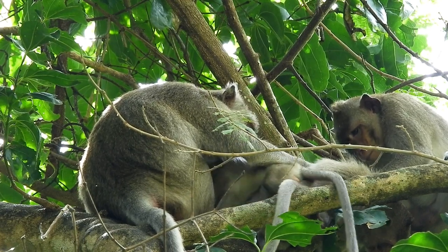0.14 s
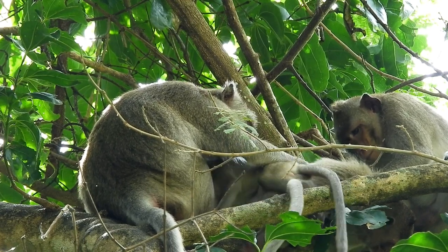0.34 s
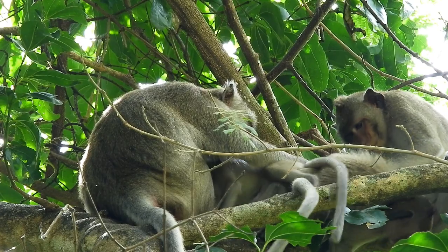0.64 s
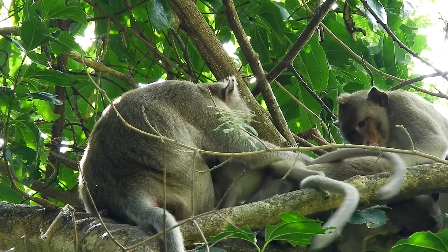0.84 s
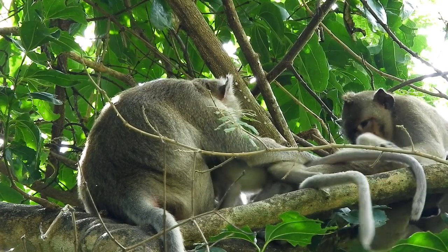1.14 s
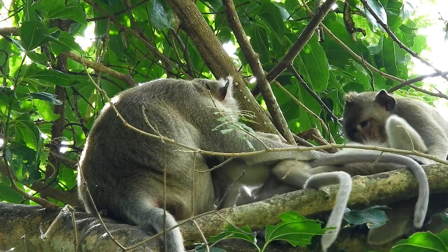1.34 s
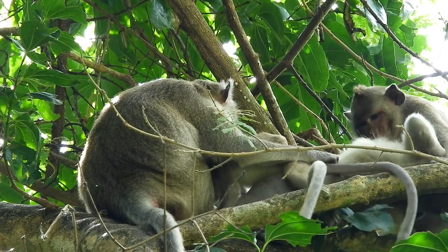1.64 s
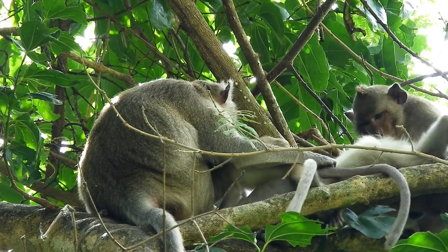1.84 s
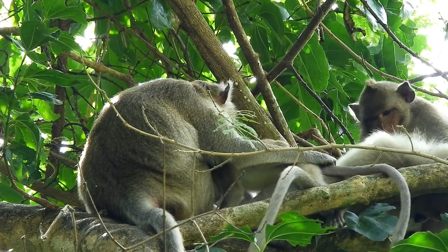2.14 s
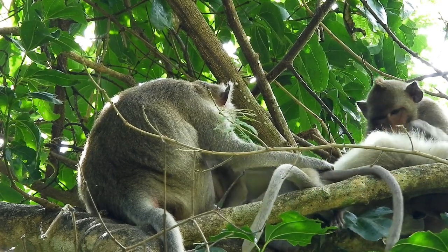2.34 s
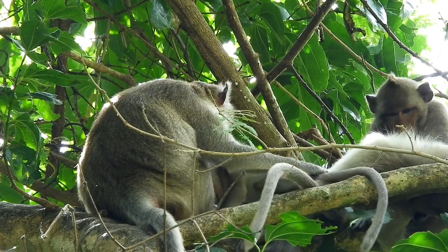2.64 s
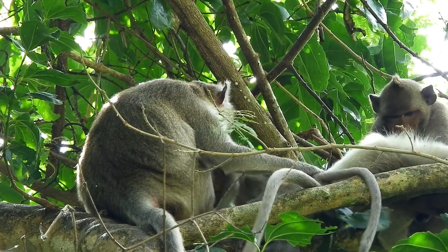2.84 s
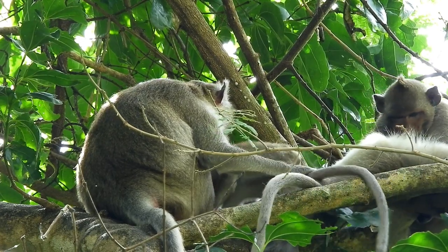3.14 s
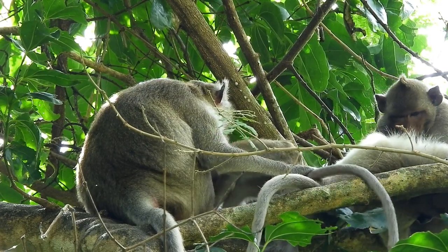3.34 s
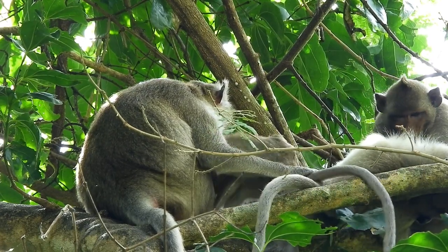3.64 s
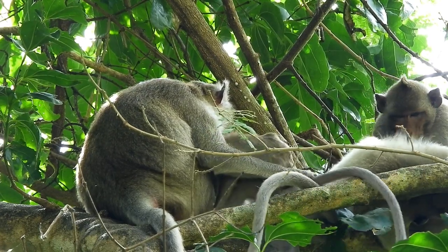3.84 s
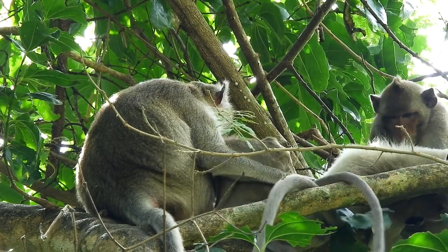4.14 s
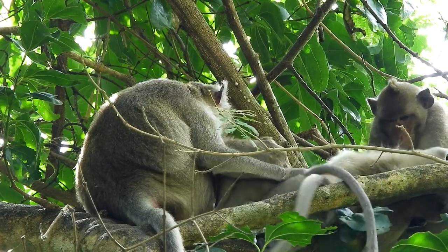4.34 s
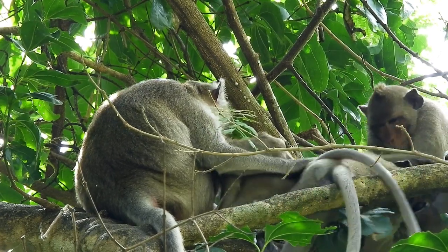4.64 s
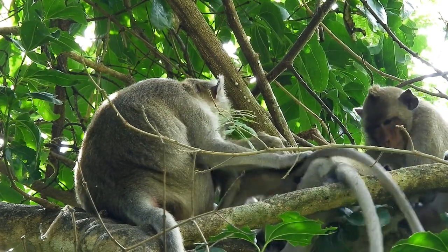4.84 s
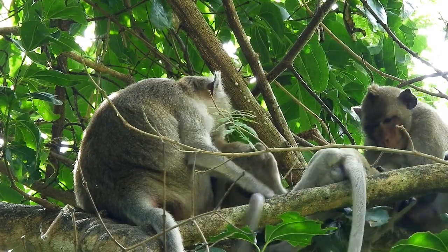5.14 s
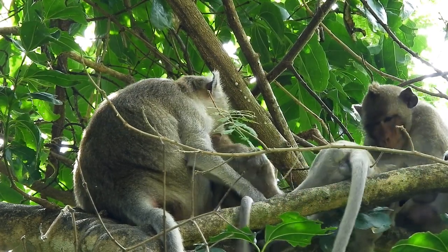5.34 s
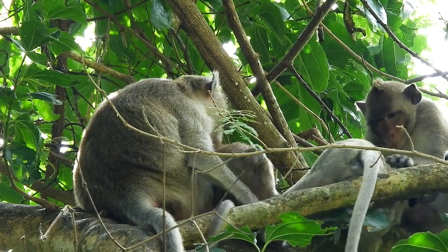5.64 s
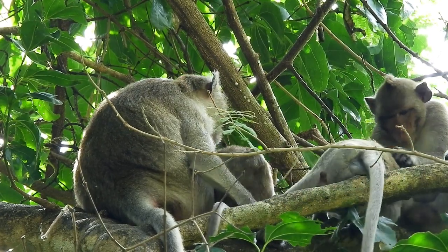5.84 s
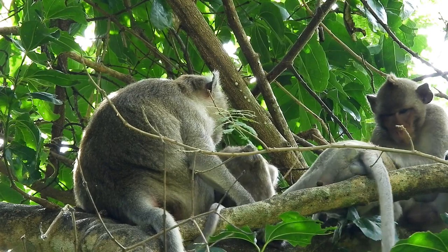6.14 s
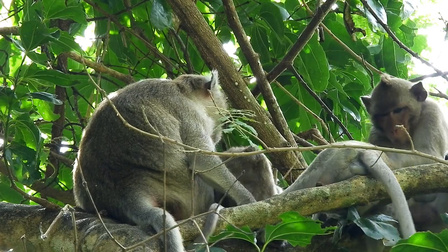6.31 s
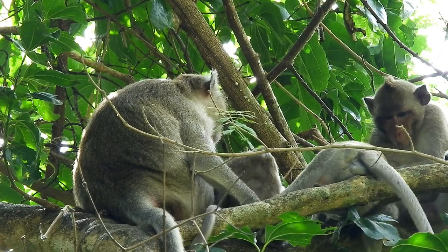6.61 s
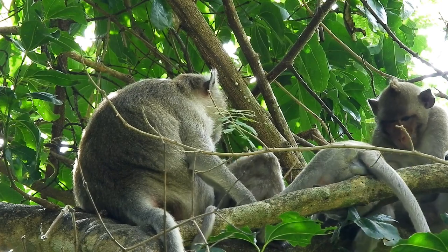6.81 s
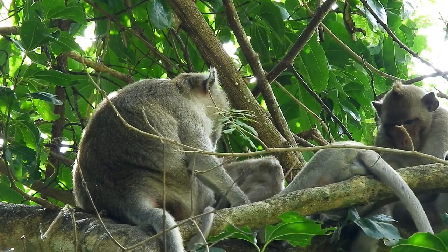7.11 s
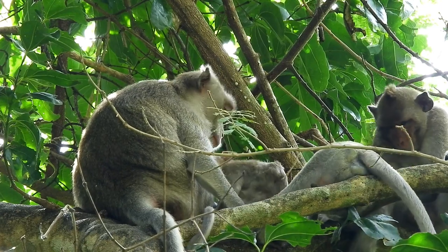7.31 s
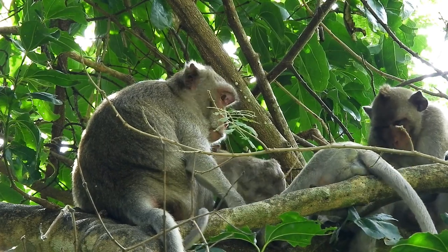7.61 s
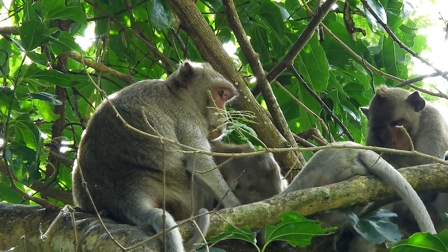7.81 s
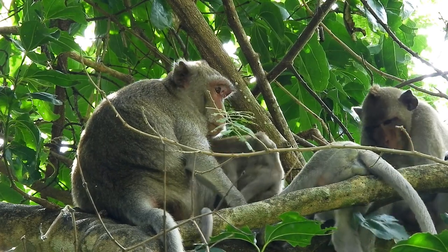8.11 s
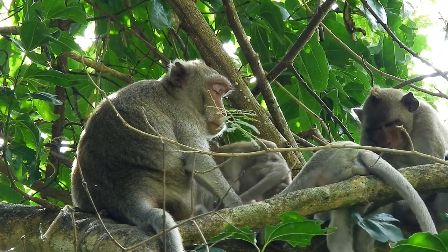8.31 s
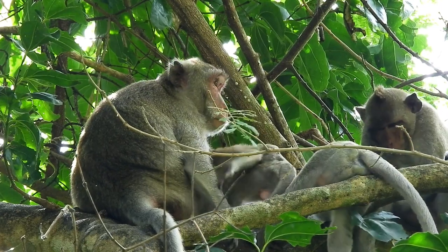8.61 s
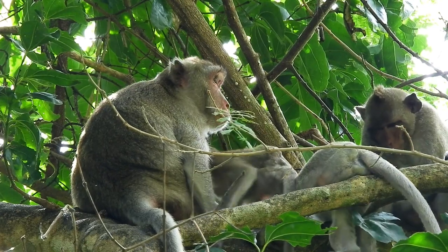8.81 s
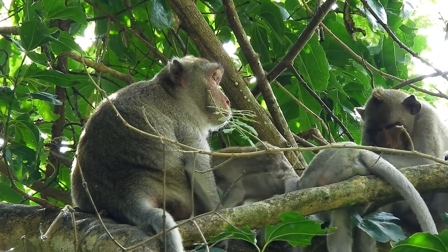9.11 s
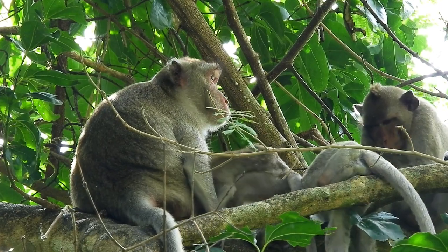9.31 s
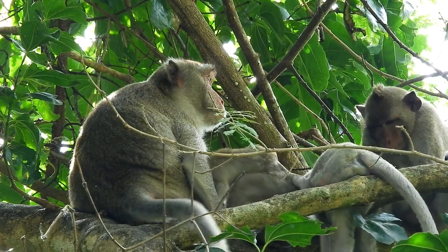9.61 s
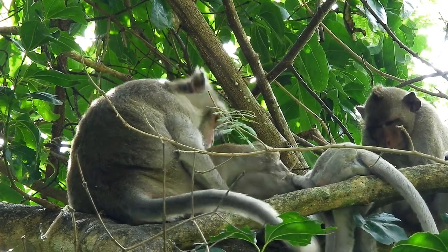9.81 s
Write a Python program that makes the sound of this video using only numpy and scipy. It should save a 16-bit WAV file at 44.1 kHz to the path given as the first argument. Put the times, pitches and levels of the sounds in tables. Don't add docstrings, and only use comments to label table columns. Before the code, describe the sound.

High, glassy crickets chirp in fast overlapping trains, about thirteen pulses a second, above a deep traffic rumble. Around three seconds a cicada starts up and swells into a bright sizzling buzz that holds to the end. A closer cricket joins after six seconds. Leaves tick and rustle faintly. The outdoor stereo is lopsided: insects bright on the left, the right muffled with rumble and a faint motor hum.

```python
import sys
import numpy as np
from scipy import signal
from scipy.fft import rfft, irfft
from scipy.io import wavfile
from scipy.ndimage import uniform_filter1d

SR = 44100
rng = np.random.default_rng(int(sys.argv[2]) if len(sys.argv) > 2 else 0)


def generate_wav(sig):
    pcm = np.round(np.clip(np.atleast_2d(sig).T, -1, 1) * 32767).astype(np.int16)
    wavfile.write(sys.argv[1], SR, pcm)


def elevation(decibels):
    levels = np.asarray(decibels, float)
    return 10 ** (levels / 20)


N = 439236


# t/s, high crickets f/Hz, low crickets f/Hz
SONG_PITCH = [(0, 7730, 7600), (1.5, 7742, 7605), (2.8, 7752, 7625), (4.3, 7748, 7622), (5.5, 7758, 7635),
              (6.5, 7755, 7618), (8, 7745, 7610), (9, 7740, 7612), (9.96, 7748, 7635)]
# first chirp t/s, end t/s, chirp period/s, start level/dB, end level/dB
HIGH_BOUTS = [(.028, 1.8, .0786, -47.5, -45.5), (1.827, 2.7, .0772, -45, -43.5),
              (2.754, 3.55, .0772, -46.5, -47), (3.601, 6.05, .079, -47.5, -45),
              (.07, 3.4, .0752, -49, -47), (3.7, 6.4, .0745, -50, -48)]
LOW_BOUTS = [(.02, 1.05, .0797, -46.5, -45.5), (1.09, 2.6, .078, -46, -47),
             (2.646, 4.55, .0775, -48.5, -45.5), (4.671, 6., .0795, -45, -47),
             (6.044, 7.8, .081, -47.5, -45), (7.82, 9.96, .0775, -45, -50)]
# first chirp t/s, end t/s, chirp period/s, start level/dB, end level/dB
UPPER_PHRASES = [(0, 1.6, .07, -61, -63), (2.2, 5.25, .07, -62, -59), (5.75, 9.7, .07, -60, -60)]
LOWER_PHRASES = [(1.4, 2.2, .07, -60, -61), (3.2, 4.3, .07, -60, -60), (4.7, 6.9, .07, -61, -60),
                 (7.6, 9.6, .07, -61, -60)]
# f/Hz, chirps per s, chirp length/s, level/dB
FAR_SINGERS = [(7750, 12.9, .07, -52), (7735, 12.5, .07, -52), (7695, 13.2, .07, -53),
               (7665, 12.1, .07, -53), (7635, 12.7, .07, -53), (7595, 13.4, .07, -53),
               (7490, 13.1, .06, -62), (7400, 13.3, .06, -63), (7355, 12.7, .06, -61),
               (7320, 12.4, .06, -62), (7290, 13., .06, -62), (7240, 12.2, .06, -62),
               (7190, 13.3, .06, -64), (5600, 7.4, .04, -66), (5350, 7.9, .04, -65), (5100, 7.0, .04, -66),
               (4850, 6.6, .045, -66)]


def crickets():
    high_hz, low_hz = curve(SONG_PITCH, 1), curve(SONG_PITCH, 2)
    near = lead(high_hz)
    for pitch, bouts in ((high_hz, HIGH_BOUTS), (low_hz, LOW_BOUTS)):
        for row in bouts:
            near += bout(pitch, *row)
    far = np.zeros(N)
    for hz, phrases in ((5790, UPPER_PHRASES), (4700, LOWER_PHRASES)):
        for row in phrases:
            far += .8 * bout(np.full(N, hz), *row, length=.04, detune_hz=60.)
    for hz, rate, length, db in FAR_SINGERS:
        luck = rng.standard_normal((150, 3))
        times = np.cumsum(1 + .03 * luck[:, 0]) / rate - .06
        for s, (spread, detune) in zip(times, luck[:, 1:]):
            add(far, s, elevation(db + 1.2 * spread) * chirp(hz + 10. * detune, length))
    near_scatter = foliage(near, t60=.15)
    far_scatter = foliage(far, t60=.25, turns_per_s=2.5)
    return near + .25 * near_scatter + .6 * far + .85 * far_scatter


FALTERS = [6.5, 6.58, 6.81, 6.88, 7.03, 7.88, 8.03, 8.18, 8.41, 9.1]


def lead(pitch):
    start_s, period_s, early_s, chirp_s = 6.118, .0764, .015, .054
    level_db, tires_db_per_s, falter_db = -38., 1.1, -6.5
    k = np.arange(int((N / SR - start_s) / period_s) + 1)
    times = start_s + period_s * k - early_s * np.exp(-k / 2)
    weak = abs(times[:, None] - FALTERS).min(1) < period_s / 2
    song, luck = np.zeros(N), rng.standard_normal((len(k), 2))
    levels = level_db - tires_db_per_s * (times - start_s) + falter_db * weak + 0.45 * luck[:, 0]
    for s, db in zip(times + .003 * luck[:, 1], levels):
        add(song, s - chirp_s / 2, elevation(db) * chirp(pitch[round(s * SR)], chirp_s, 50., -34.))
    return song


def bout(pitch, first, end, period, start_db, end_db, length=0.058, detune_hz=6.9):
    trim_db, spread_db, jitter_s = -1.5, 1.5, .003
    song, luck = np.zeros(N), rng.standard_normal((60, 3))
    for s, (spread, jitter, detune) in zip(np.arange(first, end, period), luck):
        db = trim_db + np.interp(s, [first, end], [start_db, end_db]) + spread_db * spread
        hz = pitch[round(s * SR)] + detune_hz * detune
        add(song, s - length / 2 + jitter_s * jitter, elevation(db) * chirp(hz, length, 47.0, -48.))
    return song


def chirp(hz, length, rise_hz=70.8, half_db=-60.):
    u = np.arange(-1, 1, 2 / (length * SR))
    arched_hz = hz - rise_hz * (u - .2) ** 2
    phase = 2 * np.pi * (np.cumsum(arched_hz) / SR + rng.random())
    tone = np.sin(phase) + elevation(half_db) * np.sin(phase / 2)
    return np.sqrt(2) * tone * signal.windows.tukey(len(u), .55)


# t/s, clicks per s
CLICK_RATE = [(0, 411), (2.8, 412), (3.3, 424), (3.8, 434), (4.4, 431), (5.3, 428), (6.9, 428), (8, 432),
              (9, 435), (9.96, 436)]
# t/s, level/dB
BUZZ = [
    (0.0, -20),
    (2.75, -24),
    (2.95, -10),
    (3.47, -6),
    (3.8, -4),
    (3.95, -.5),
    (7.29, 1.5),
    (9.96, 0.5),
]
# f/Hz, level/dB
LOW_MODE = [(7700, -22), (7950, -7), (8250, -3), (8600, 0), (9400, -2), (9900, -9), (10800, -22)]
HIGH_MODE = [(9800, -32), (10700, -11), (11500, 0.5), (12300, 5), (12850, 2), (13300, 1.5), (14000, -6.5),
             (14600, -11), (15200, -24)]


def cicada():
    wobble = 1 + .0012 * evened(uniform_filter1d(rng.standard_normal(N), 3000))
    turns = np.cumsum(curve(CLICK_RATE, 1) * wobble) / SR
    count = np.arange(1, int(turns[-1]))
    second_drum = count % 2
    luck = rng.standard_normal((4500, 2))[:len(count)]
    at = np.interp(count + .12 * second_drum + .004 * luck[:, 0], turns, np.arange(N))
    strength = (1 - .65 * second_drum) * elevation(1.7 * luck[:, 1])
    taps = at.astype(int)[:, None] + np.arange(-12, 13)
    pulses = np.sinc(taps - at[:, None]) * np.hanning(27)[1:-1]
    clicks = np.zeros(N + 40)
    np.add.at(clicks, taps + 12, strength[:, None] * pulses)
    clicks = evened(clicks[12:N + 12])
    heard = .72 * clicks + .9 * foliage(clicks, t60=.06, turns_per_s=3.1)
    low = colour(heard + 1.4 * rng.standard_normal(N), LOW_MODE, patchy_db=.8, size=512)
    high = colour(heard + .85 * rng.standard_normal(N), HIGH_MODE, patchy_db=.8, size=512)
    effort_db = curve(BUZZ, 1)
    return evened(low) * elevation(-50. + .2 * effort_db) + evened(high) * elevation(-54.5 + effort_db)


# t/s, level/dB, length/s
RUSTLES = [(1.238, -58, 0.038), (1.927, -66, 0.054), (3.409, -51, 0.041), (4.528, -60, 0.087),
           (4.637, -55, 0.056), (5.472, -60, .03), (5.91, -69, 0.037), (6.933, -54, 0.053),
           (7.12, -55, 0.16), (7.7, -59, 0.13), (8.02, -50, .025), (8.065, -54, 0.038), (8.25, -50, 0.05),
           (9.198, -62, .08)]
# t/s, level/dB
TICKS = [(1.252, -48), (2.8514, -42), (5.2664, -48), (6.0721, -45), (6.6179, -50), (8.4662, -47)]
# f/Hz, level/dB
LEAF = [(1500, -30), (3000, -10), (5000, 5), (7000, 10), (9500, 9), (12000, -8), (15600, -12)]


def leaves():
    snaps, t = np.zeros(N), np.arange(400) / SR
    for s, db, length in RUSTLES:
        n = round(length * SR)
        grains = rng.standard_normal(8000) * elevation(1.2 * rng.exponential(1, 8000))
        add(snaps, s, elevation(db) * evened(grains[:n]) * np.hanning(n) ** .5)
    for s, db in TICKS:
        add(snaps, s, elevation(db + 1.0 - 60 * t / 0.017) * rng.standard_normal(400))
    scattered = snaps + 1.5 * foliage(snaps, t60=0.091)
    return colour(scattered, LEAF, size=256) / np.sqrt(SR / 2)


# t/s, f/Hz, length/s, level/dB
NOTES = [(6.2, 2860, .03, -64), (6.5, 2850, .03, -70), (8.167, 1950, 0.028, -64), (8.455, 2700, .025, -65),
         (8.517, 2740, .025, -65), (8.61, 2000, 0.033, -62), (9.67, 2840, .025, -68),
         (9.74, 2850, .025, -66), (9.539, 380, 0.054, -55), (9.707, 415, 0.117, -58),
         (9.87, 458, 0.08, -59)]


def birds():
    out = np.zeros(N)
    for s, hz, length, db in NOTES:
        add(out, s, elevation(db) * chirp(hz, length, rise_hz=6.1, half_db=-60.))
    return out + .5 * foliage(out, t60=0.14)


# f/Hz, width/Hz, left level/dB, right level/dB
MOTOR = [
    (689, 40, -71, -60),
    (102, 14, -52, -52),
]


def hums():
    motor, idle = (narrow(hz, width) * elevation([[left_db], [right_db]]) for hz, width, left_db, right_db in MOTOR)
    return motor + idle * np.clip((np.arange(N) / SR - 8.05) / 0.063, 0, 1)


# t/s, nearness level/dB, engine drone level/dB
TRAFFIC = [(0.0, 0, -51), (0.44, 2, -39.5), (1.86, 4, -41), (3.08, 2.5, -35.5), (3.69, 2, -41.5),
           (3.9, 1.5, -56), (5.3, 1, -50), (5.94, -1, -44.5), (7.9, -2.5, -60.5), (9.96, -4.5, -65)]
# t/s, tyre swell level/dB, exhaust swell level/dB
PASSES = [
    (.6, 0.5, 3.5),
    (3.2, 2.5, 0),
    (5.1, 1.7, 1),
    (7.3, 3, 0.),
    (9.5, -2., 0.),
]
# f/Hz, level/(dB per Hz)
RUMBLE = [(22, -83), (33, -78), (43, -74), (65, -74.5), (100, -62.5), (140, -63), (200, -63), (225, -69),
          (260, -108), (300, -81.5)]
ROAD_LEFT = [(240, -79), (310, -87.5), (430, -82.5), (560, -88.5), (750, -81.5), (930, -76), (1300, -81.5),
             (1900, -88.5), (2700, -96), (3600, -101.5), (5000, -98.5)]
ROAD_RIGHT = [(240, -80), (280, -96), (350, -75), (400, -86), (550, -88), (760, -84.5), (930, -82),
              (1400, -91), (2000, -100.3), (3200, -107.3), (5000, -103.8)]
# f/Hz, share 0 to 1
SAME = [(250, 0.92), (350, 0.53), (450, 0.64), (600, 0.67), (900, 1), (1300, 0.4), (1700, 0.75),
        (2300, 0.41), (3000, 0.14)]
# f/Hz, phase/rad
PORT_LAG = [(30, -.1), (80, -.03), (120, .08), (200, .25), (450, .6), (1000, 1.25), (1700, 1.6),
            (3000, 1.6)]


def traffic():
    a, b, c, d = rng.standard_normal((4, N))
    near_db, t = curve(TRAFFIC, 1, True), np.arange(N) / SR
    rumble = elevation(near_db) * colour(a, RUMBLE, patchy_db=0.6, size=4096)
    rumble += elevation(curve(TRAFFIC, 2) - 3.5) * narrow(213, 18.0)
    hz = np.fft.rfftfreq(N, 1 / SR)
    same = np.clip(np.interp(hz, *np.transpose(SAME)), 0, 1)
    other = irfft(same * rfft(b) + np.sqrt(1 - same ** 2) * rfft(c), N)
    roar = np.array([colour(b, ROAD_LEFT, patchy_db=2.0), colour(other, ROAD_RIGHT, patchy_db=2.0)])
    exhaust = signal.sosfiltfilt(signal.butter(3, 620, fs=SR, output="sos"), roar)
    tyres = roar - exhaust
    tyre_db, pipe_db = np.zeros((2, N))
    for s, tyre_swell_db, pipe_swell_db in PASSES:
        swell = np.exp(-((t - s) / 0.68) ** 2)
        tyre_db += tyre_swell_db * swell
        pipe_db += pipe_swell_db * swell
    roar = elevation(0.59 * near_db + pipe_db) * exhaust + elevation(0.29 * near_db + tyre_db - 1.74) * tyres
    stray = colour(d, [(20, -78.0), (45, -91.0), (100, -86.0), (220, -84.0)], size=4096)
    left, right = rumble * elevation([[.3], [-.3]]) + stray * [[1], [-1]] + roar
    lag = np.interp(hz, *np.transpose(PORT_LAG))
    return np.array([left, irfft(rfft(right) * np.exp(-1j * lag), N)])


# f/Hz, level/(dB per Hz)
AIR_LEFT = [(2500, -100), (3500, -97), (4500, -92), (4800, -88), (5300, -83.5), (5650, -84.5), (5900, -89),
            (6600, -92), (7100, -85), (7900, -88), (9000, -114), (10000, -94), (12000, -94), (14000, -103),
            (15600, -110)]
AIR_RIGHT = [(2400, -108), (3300, -109), (4100, -102.5), (5700, -102), (6200, -106.5), (7600, -106.5),
             (8050, -113), (8400, -109), (10500, -114.5), (12000, -113.5), (12600, -118), (13100, -115.5),
             (14900, -121), (15600, -126)]


def air():
    thinning = elevation(0.06 * (6 - np.arange(N) / SR))
    wash = thinning * colour(rng.standard_normal(N), AIR_LEFT, patchy_db=1.1, size=512)
    hiss = colour(rng.standard_normal(N), AIR_RIGHT, size=1024)
    return np.array([wash, hiss])


def foliage(x, t60=.15, turns_per_s=1.49):
    t, out = np.arange(N) / SR, np.zeros(N)
    for k in range(3):
        tail = rng.standard_normal(8000) * elevation(-60 * t[:8000] / t60)
        feed = np.cos(np.pi * (turns_per_s * t + k / 3)) * np.sqrt(2 / 3)
        out += signal.oaconvolve(x * feed, tail / np.linalg.norm(tail))[:N]
    return out


def narrow(hz, width):
    r = np.exp(-np.pi * width / SR)
    noise = rng.standard_normal(N) + 1j * rng.standard_normal(N)
    slow = signal.lfilter([1], np.poly([r, r]), noise)
    return evened((slow * np.exp(2j * np.pi * hz * np.arange(N) / SR)).real)


def colour(x, spectrum, patchy_db=0., size=2048):
    hz, _, z = signal.stft(x, SR, nperseg=size)
    patches = uniform_filter1d(rng.standard_normal(z.shape), size // 100, 0)
    patches = uniform_filter1d(patches, 8192 // size, 1)
    gain = elevation(read(spectrum, hz)[:, None] + patchy_db * evened(patches)) * np.sqrt(SR / 2)
    return signal.istft(z * gain, SR, nperseg=size)[1][:N]


def read(points, hz):
    f, db = np.transpose(points)
    octaves = np.log2(hz + 1)
    outside = np.maximum(np.log2(f[0]) - octaves, 0) + np.maximum(octaves - np.log2(f[-1]), 0)
    return np.interp(octaves, np.log2(f), db) - 40 * outside


def curve(rows, column, centred=False):
    rows = np.array(rows)
    values = np.interp(np.arange(N) / SR, rows[:, 0], rows[:, column])
    return values - centred * values[4 * SR:8 * SR].mean()


def evened(x):
    return x / np.sqrt(np.mean(x ** 2) + 1e-20)


def add(mix, s, sound):
    part = mix[max(round(s * SR), 0):][:len(sound)]
    part += sound[:len(part)]


def scene():
    trees = crickets() + cicada() + leaves()
    trees_in_ports = trees * elevation([[0], [-46]])
    birds_in_ports = birds() * elevation([[0], [-8.]])
    return trees_in_ports + birds_in_ports + hums() + traffic() + air()


# f/Hz, level/(dB per Hz)
FAINT_LEFT = [(1500, -102), (2600, -101), (3600, -100.5), (4500, -99), (6000, -102), (13000, -106),
              (14000, -105), (14500, -104.5), (14850, -102), (15300, -97)]
FAINT_RIGHT = [(1500, -118), (3300, -110), (5000, -108), (6200, -108.5), (7600, -109), (8050, -111),
               (8500, -111.5), (10500, -116.5), (12000, -116), (12600, -117), (13200, -120), (14800, -124),
               (15150, -112)]


def drop_faint(ports):
    gated = []
    for x, faint in zip(ports, (FAINT_LEFT, FAINT_RIGHT)):
        hz, _, z = signal.stft(x, SR, nperseg=2048, noverlap=1024)
        power = (abs(z[:1024]) ** 2).reshape(128, 8, -1).mean(1)
        density = power * 2048 * 4 / 3 / SR
        threshold = elevation(2 * read(faint, np.maximum(hz[4:1024:8], 1500)))
        kept = np.repeat(density > threshold[:, None], 8, 0)
        kept = np.vstack([kept, kept[-1:]])
        gated.append(signal.istft(z * kept, SR, nperseg=2048, noverlap=1024)[1][:N])
    return np.array(gated)


def band_limit(x):
    return signal.sosfilt(signal.butter(12, 15670, fs=SR, output="sos"), x)


def record(dry):
    mix = drop_faint(dry) - .0007
    return band_limit(mix)


dry = scene()
out = record(dry)
generate_wav(out)
```